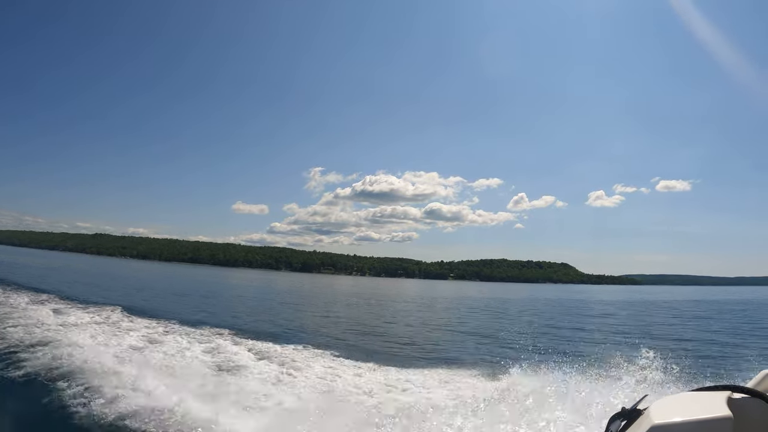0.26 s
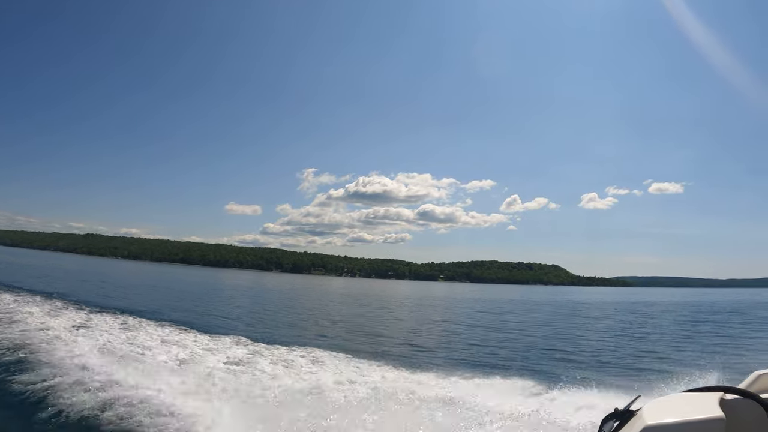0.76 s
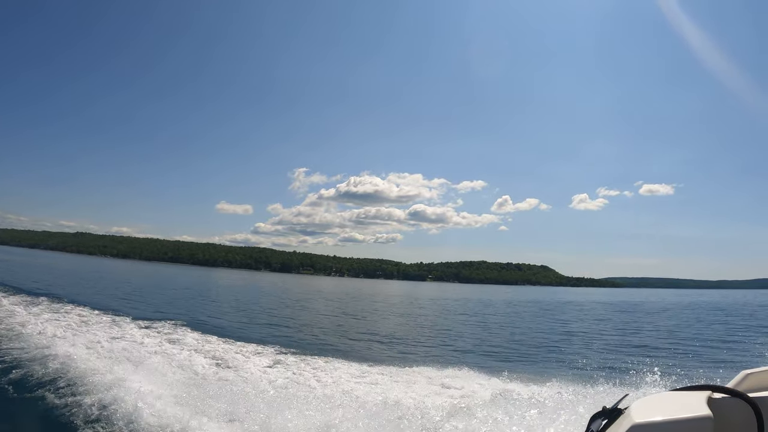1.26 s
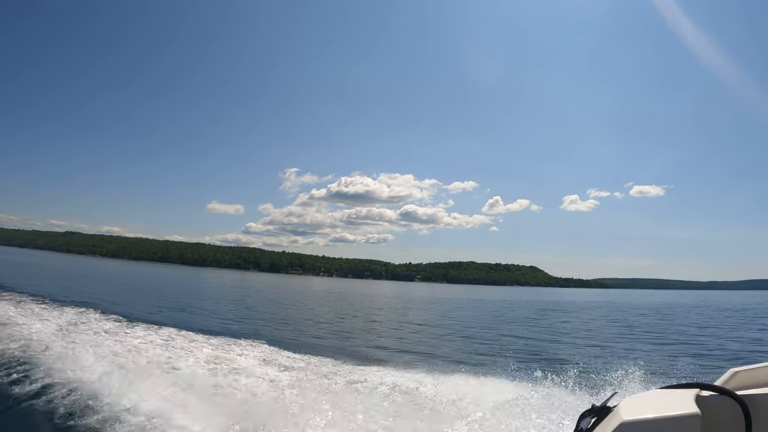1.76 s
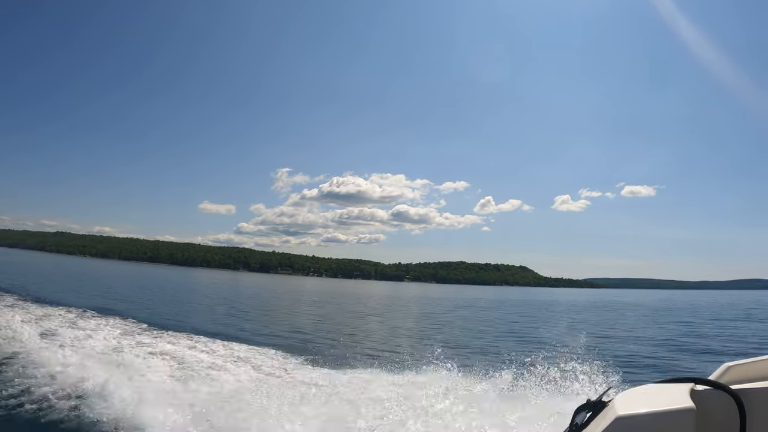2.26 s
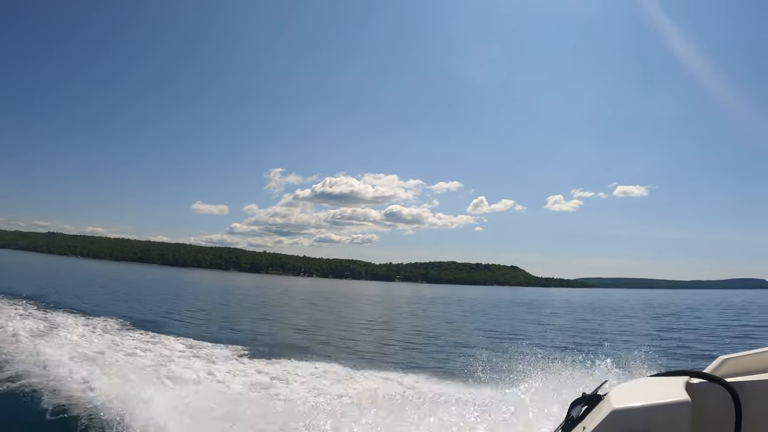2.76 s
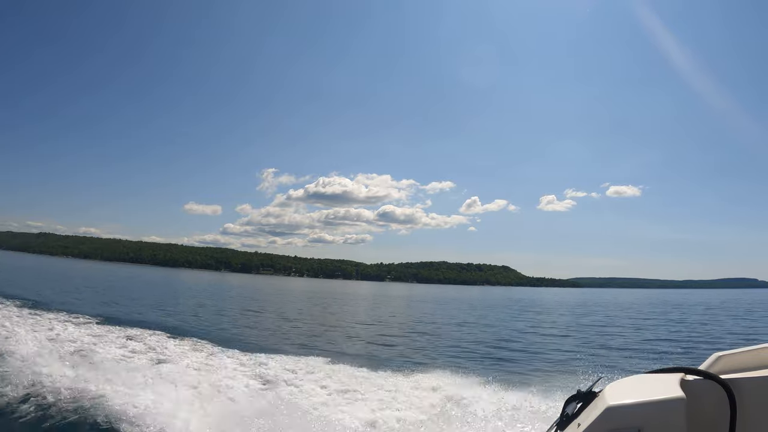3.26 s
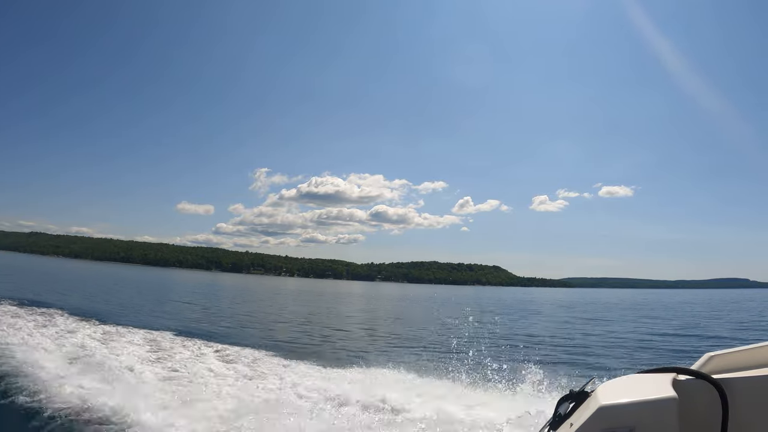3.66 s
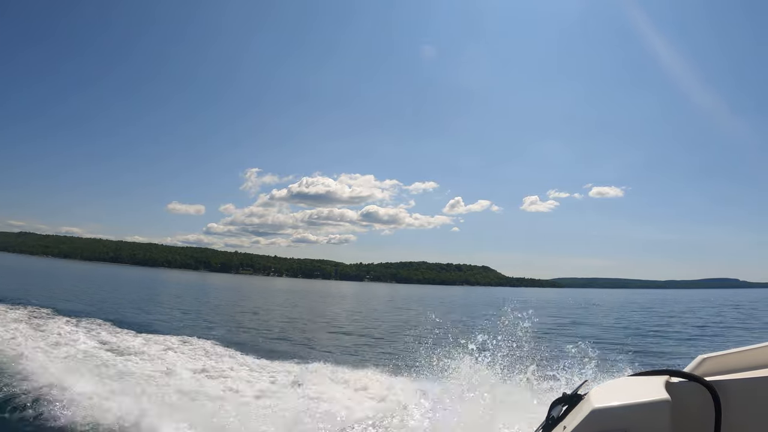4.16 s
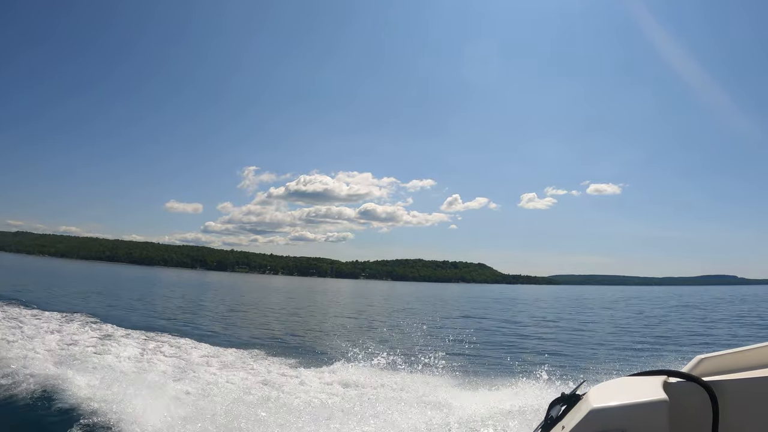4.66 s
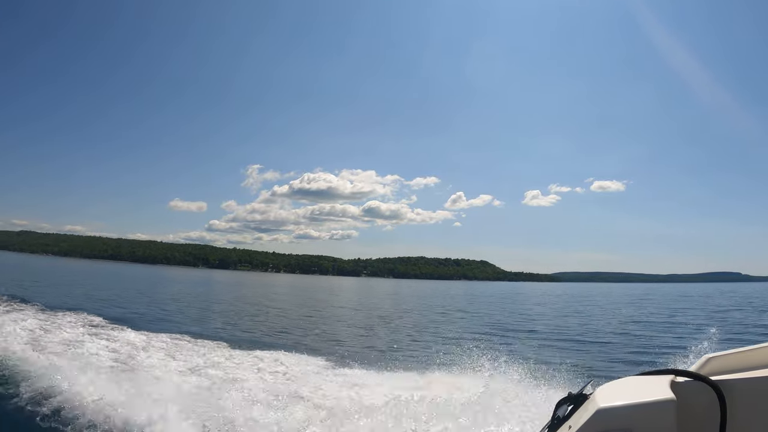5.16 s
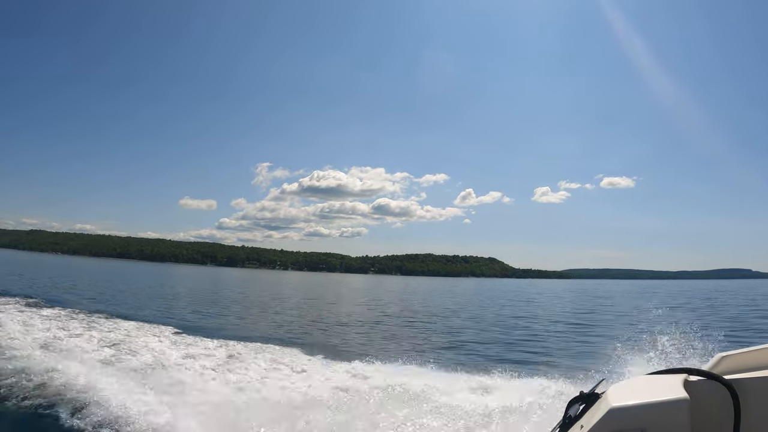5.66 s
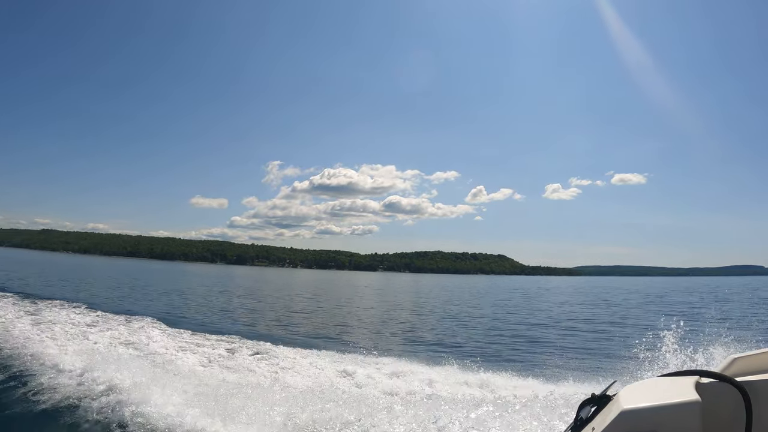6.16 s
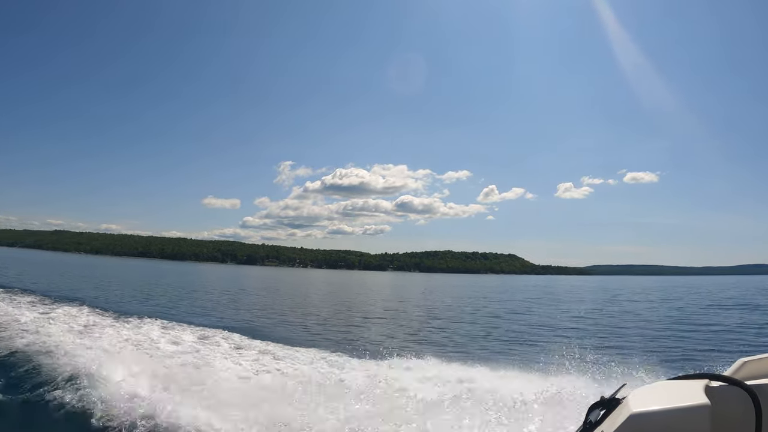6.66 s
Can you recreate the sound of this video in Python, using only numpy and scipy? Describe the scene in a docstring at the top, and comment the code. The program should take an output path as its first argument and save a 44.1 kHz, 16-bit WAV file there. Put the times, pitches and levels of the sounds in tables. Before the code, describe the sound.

Two boat engines cruise at constant speed, their low rough hum throbbing unevenly, with burbling exhaust and a rumbling hull. Foamy water starts fairly restrained, swells after about two seconds into a full rush with crisp spray, and stays strong until a brief final easing. Dull low bumps come irregularly. Open water, dry outdoor sound heard from the stern, with light wind hiss behind everything.

```python
"""Motorboat stern under way, open water

Standing at the stern, microphone in the open air. Twin engines and their drives are sums of sines at nearly
equal rates, so their tones beat; the exhausts burble as pulsed, low-coloured noise. The hull rumbles, the wake
rushes and the spray fizzes: patchy noise that grows louder on the whole and eases off at the very end. A low
noise buffets and swells in short thuds of the hull meeting waves, under a steady broadband hiss of air."""
import sys
import numpy as np
from scipy import signal
from scipy.fft import rfft, irfft, next_fast_len
from scipy.io import wavfile
from scipy.ndimage import uniform_filter1d, minimum_filter1d, map_coordinates

SR = 44100
rng = np.random.default_rng(int(sys.argv[2]) if len(sys.argv) > 2 else 0)


def generate_wav(signal):
    """Clip the signal to [-1, 1] and save it as 16-bit WAV at the path in sys.argv[1]."""
    frames = np.transpose(np.atleast_2d(signal))
    scaled = np.clip(frames, -1, 1) * 32767
    pcm = np.round(scaled).astype(np.int16)
    wavfile.write(sys.argv[1], SR, pcm)


N = 304731

# Strong exhaust tones, as multiples of the engine's cycle rate.
STRONG_ORDERS = (2, 4, 6, 7, 8, 10, 11)
# Their beating against a slightly slower twin, one row for each strong order. Each row: level in dB, twin's
# share in dB, beat period in seconds, first lull in seconds, dB gained per dB of load.
TWIN_BEATS = [(-32.3, -8, 2.23, 0.7, -1.5), (-24.5, -4.5, 1.112, 0.965, -0.8),
              (-21.6, -5.5, 1.85, 0.57, 0.4), (-32, -4.5, 3.34, 0.38, 1.9), (-27.5, -2, 0.558, 0.21, -0.1),
              (-33.8, -5.5, 5.4, 2.82, 0.5), (-31, -9.5, 1.036, 0.81, 0.9)]
# Orders whose balance tips at moments.
TIPPING_ORDERS = (4, 6, 8)
# Those moments. Each row: centre in seconds, half length in seconds, then change in dB for each tipping order.
BALANCE_TIPS = [(4.33, 0.11, 12.5, -9, -0.5), (5.48, 0.23, -8.5, 2.5, 0), (6.6, 0.2, -8, -0.5, 5.5)]
# Turning parts and their weaker tones. Each row: cycles per second, then a list of (multiple of that rate,
# relative level in dB).
TURNING_PARTS = [ (23.385, [(1, -32), (5, -43), (15, -41), (20, -44)]), (23.475, [(1, -49), (12, -41),
                 (16, -50.5), (18, -49), (21, -52), (27, -50)]), (23.563, [(5, -35.5), (9, -33.5),
                 (12, -36), (14, -47.5), (15, -40), (16, -45), (18, -45), (21, -48.5), (24, -47.5),
                 (25, -42.5), (26, -51), (27, -49), (29, -50)]), (23.606, [(5, -40.5), (9, -44), (12, -43),
                 (13, -34.5), (14, -44.5), (15, -46), (16, -42.5), (20, -46)])]
# Water thrown by the hull. Each row: time in seconds, wake in dB, spray in dB, both before a fixed lift.
WATER_LEVELS = [(0, -40, -43.5), (0.55, -39.0, -40.0), (1.1, -36.5, -37.2), (1.95, -36.5, -37),
                (2.3, -33.5, -34.5), (3.5, -32.5, -33.5), (5.1, -31, -31.5), (5.5, -32.0, -32.5),
                (6.7, -30.5, -31.7), (6.91, -35, -37)]
# Resonances of the hull and engine covers. Each row: centre in Hz, width in Hz, relative lift in dB.
PANEL_RESONANCES = [(210, 23, 2.5), (313.5, 17.5, 5.5), (361, 22, 4), (459, 25, 5), (762, 43, 2.5),
                    (1740, 130, 1.5), (1965, 120, 3.5)]
# Low thuds of the hull meeting waves, near 45 Hz. Each row: peak in seconds, dB over the steady buffeting.
HULL_THUDS = [(0.17, 8), (1.1, 8), (2.07, 5), (3.65, 4), (4.08, 7), (4.85, 4), (5.66, 5), (6.12, 6)]
# Spectra of the noise sources. Each row: frequency in Hz, relative level in dB per Hz.
EXHAUST_SPECTRUM = [(30, -40), (70, 4.5), (110, -4.5), (200, -0.5), (310, -4.5), (420, -14), (700, -19.5),
                    (1500, -44), (4000, -65)]
HULL_SPECTRUM = [(30, -30), (70, -6), (95, 0), (130, -2.5), (185, -1.5), (228, -6.5), (330, -8), (420, -15),
                 (510, -19.5), (900, -26), (3000, -82)]
WAKE_SPECTRUM = [(100, -37), (350, -2), (650, 2), (850, -1), (1250, -2), (1450, -4.5), (1700, -4.5),
                 (2050, -6), (2250, -12.5), (3000, -12.5), (6000, -37), (12000, -70)]
SPRAY_SPECTRUM = [(700, -38), (1700, -0.5), (2500, -1.5), (3100, -1), (3800, 2), (4250, -3), (5400, -4),
                  (7000, -10), (8300, -13.5), (9700, -19), (11000, -20.5), (11500, -29.5), (13200, -30.5),
                  (14500, -45)]
BUFFET_SPECTRUM = [(8, -22), (18, -31), (31, -10), (45, 2), (75, -6.5), (130, -12), (400, -39), (1500, -80)]
AIR_SPECTRUM = [(300, -20), (750, 9.5), (1100, 2), (2000, -1), (6000, -5.5), (10800, -22), (11500, -23),
                (12400, -11), (13300, -12), (14400, -27)]

PULL = 0.71  # 0-1: the engines, coupled by the hull, linger in step and slip quickly through each lull
RUMBLE_DB, RUMBLE_GROWS = -21.5, 0.39  # hull rumble at mean wake; dB gained per dB of wake
BUFFET_DB, THUD_S = -30.5, 0.086  # buffeting between thuds; half length of a thud in seconds
CEILING_DB, TOP_HZ = -3.0, 15780  # the recorder's limiter ceiling and band limit


def amp(db):
    """Decibels to gain."""
    return 10 ** (np.asarray(db) / 20)


def unit(x):
    """Scale to rms 1."""
    return x / np.sqrt(np.mean(x ** 2) + 1e-20)


def curves(rows):
    """One value per sample for each column after the time."""
    seconds, *columns = np.transpose(rows)
    return [np.interp(np.arange(N) / SR, seconds, column) for column in columns]


def wobble(rate):
    """A smooth random curve, rate knots a second."""
    knots = rng.standard_normal(int(N * rate / SR) + 4)
    return map_coordinates(knots, [np.arange(N) * rate / SR])


def swell(at, half_length):
    """A smooth rise and fall, 1 at its top."""
    return np.exp(-((np.arange(N) / SR - at) / half_length) ** 2)


def filtered(x, response):
    """x times a gain that depends on frequency."""
    size = next_fast_len(N + SR // 2)  # padded so the end does not wrap onto the start
    spectrum = rfft(x, size) * response(np.fft.rfftfreq(size, 1 / SR))
    return irfft(spectrum, size)[:N]


def coloured(x, spectrum):
    """x shaped by (Hz, dB) points on a log axis, at rms 1."""
    f, db = np.transpose(spectrum)
    return unit(filtered(x, lambda hz: amp(np.interp(np.log(hz + 1), np.log(f), db))))


def crank(rate, hunt):
    """Cycle angle of one turning part; the propeller load makes it hunt by a fraction of a cycle."""
    return 2 * np.pi * (rate * np.arange(N) / SR + hunt * wobble(5))


def drone(angles, load_db, waver_db, rough_db):
    """Strong low exhaust tones: the slower engine slips behind, so each pair swells and cancels in turn."""
    t, out = np.arange(N) / SR, np.zeros(N)
    tips = sum(np.outer(dbs, swell(at, half)) for at, half, *dbs in BALANCE_TIPS)
    tip_db = dict(zip(TIPPING_ORDERS, tips))
    for order, angle, row in zip(STRONG_ORDERS, angles, TWIN_BEATS):
        db, share_db, period, lull, grows = row
        phase = order * angle + 2 * np.pi * rng.random()
        beat = 2 * np.pi * (t - lull) / period
        lag = beat + PULL * np.sin(beat)
        twin = amp(share_db + waver_db * wobble(6)) * np.sin(phase - lag)
        pair = np.sin(phase) - twin  # opposed at zero lag: the lull
        level_db = db + grows * load_db + tip_db.get(order, 0) + rough_db * wobble(11)
        out += amp(level_db) * pair
    return np.sqrt(2) * out


def tones(angle, orders, load_db, waver_db, rough_db):
    """Unequal cylinders sound multiples of the cycle rate, each wavering slowly and roughening faster."""
    out = np.zeros(N)
    for order, db in orders:
        bite = np.clip((order - 4) / 7, 0, 1)  # load moves only the tones above the 4th order
        level_db = db + bite * load_db + waver_db * wobble(4.05) + rough_db * wobble(23)
        out += amp(level_db) * np.sin(order * angle + 2 * np.pi * rng.random())
    return np.sqrt(2) * out


def burble(angle, depth, lope):
    """Each firing blows a puff of gas through the water, stronger once a crank turn."""
    firings = 1 + depth * np.cos(4 * angle)  # four a cycle
    turns = 1 + lope * np.cos(2 * angle)  # two crank turns a cycle
    return coloured(firings * turns * rng.standard_normal(N), EXHAUST_SPECTRUM)


def engines(wake_db):
    """Slightly different rates beat against each other; the exhaust gas burbles under the tones."""
    load_db = 0.32 * (wake_db - wake_db.mean())  # pushing more water takes more effort
    angles = [crank(rate, hunt=0.0017) for rate, _ in TURNING_PARTS]
    hum = sum(tones(angle, orders, load_db, waver_db=1.2, rough_db=1.36)
              for angle, (_, orders) in zip(angles, TURNING_PARTS))
    slowest, slow, fast, fastest = angles
    gas = unit(burble(slowest, depth=0.92, lope=0.98) + burble(fast, depth=0.63, lope=0.53))
    drone_angles = [fastest, fastest, fast, fastest, fastest, fastest, slow]  # one for each strong order
    low = drone(drone_angles, load_db, waver_db=1.0, rough_db=0.9)
    return low + amp(0.44) * hum + amp(-28.5 + load_db) * gas


def churn(patchy_db):
    """Tumbling water: white noise with patches of random gain in time and frequency."""
    cells = signal.stft(rng.standard_normal(N), nperseg=512)[2]
    patches = uniform_filter1d(rng.standard_normal(cells.shape), size=7, axis=0)  # across frequency
    patches = uniform_filter1d(patches, size=12, axis=1)  # across time
    return unit(signal.istft(cells * amp(patchy_db * unit(patches)), nperseg=512)[1][:N])


def panels(x):
    """Hull panels lift narrow bands of whatever shakes them; the result is at rms 1."""
    def lift_db(f):
        return sum(db / (1 + (2 * (f - hz) / width) ** 2) for hz, width, db in PANEL_RESONANCES)
    return unit(filtered(x, lambda f: amp(lift_db(f))))


def hull_rumble(wake_db):
    """Low noise through the hull panels, harder as the wake grows."""
    level_db = RUMBLE_DB + RUMBLE_GROWS * (wake_db - wake_db.mean()) + 0.5 * wobble(6)
    return amp(level_db) * panels(coloured(churn(patchy_db=0.97), HULL_SPECTRUM))


def wake_rush(wake_db):
    """The wake tumbles: mid-band churning noise, coloured by the panels."""
    level_db = wake_db + 3.0 + 0.33 * wobble(14)
    return amp(level_db) * panels(coloured(churn(patchy_db=0.84), WAKE_SPECTRUM))


def droplets(per_second, spread_db):
    """Tiny impacts of falling spray, a few much larger than the rest."""
    hit = rng.random(N) < per_second / SR
    size = amp(spread_db * np.minimum(rng.exponential(size=N), 5))
    return unit(hit * size * rng.standard_normal(N))


def spray_fizz(spray_db):
    """Thrown spray rains back: bright churning noise with droplet impacts in it."""
    fizz = churn(patchy_db=0.5) + amp(-8.0) * droplets(per_second=2500, spread_db=2.5)
    level_db = spray_db + 0.45 + 0.32 * wobble(12)
    return amp(level_db) * coloured(fizz, SPRAY_SPECTRUM)


def hull_thuds():
    """A low buffeting that swells in short thuds as the hull meets waves."""
    thud_db = sum(db * swell(at, THUD_S) for at, db in HULL_THUDS)
    level_db = BUFFET_DB + thud_db + 1.5 * wobble(9)
    return amp(level_db) * coloured(rng.standard_normal(N), BUFFET_SPECTRUM)


def air_hiss():
    """The airstream past the microphone: broadband noise at a steady level."""
    return amp(-46.0) * coloured(rng.standard_normal(N), AIR_SPECTRUM)


def scene():
    """Engines, water, hull thuds and air at the stern."""
    wake_db, spray_db = curves(WATER_LEVELS)
    water = hull_rumble(wake_db) + wake_rush(wake_db) + spray_fizz(spray_db)
    return (engines(wake_db) + water + hull_thuds() + air_hiss())[None]


def limited(x, ceiling_db):
    """A look-ahead limiter eases the gain down around the highest crests."""
    needed = np.minimum(1, amp(ceiling_db) / (np.abs(x) + 1e-9))
    held = minimum_filter1d(needed, size=700)  # samples
    return x * uniform_filter1d(held, size=700)


def record(dry):
    """The recorder limits its peaks and keeps nothing above its band limit."""
    return filtered(limited(dry[0], CEILING_DB), lambda hz: hz < TOP_HZ)[None]


dry = scene()
out = record(dry)
generate_wav(out)
```